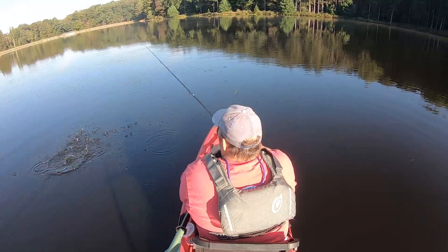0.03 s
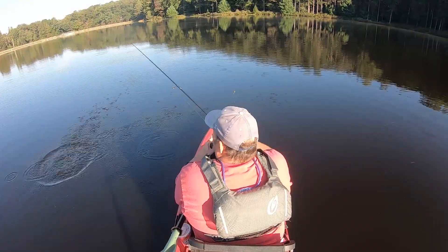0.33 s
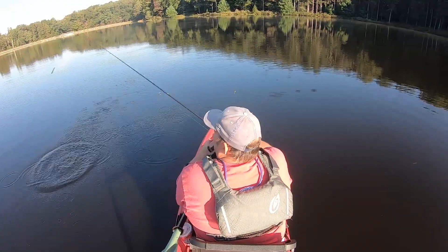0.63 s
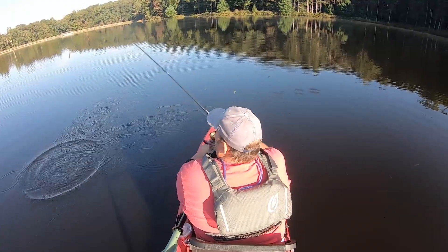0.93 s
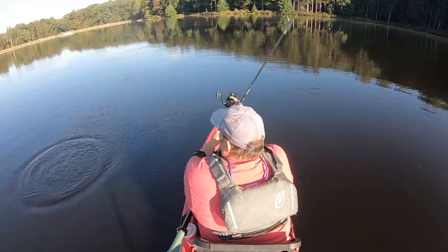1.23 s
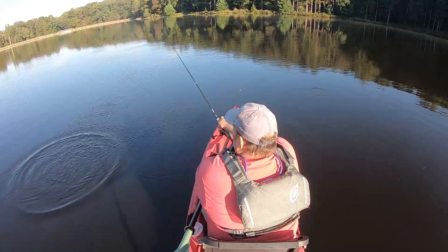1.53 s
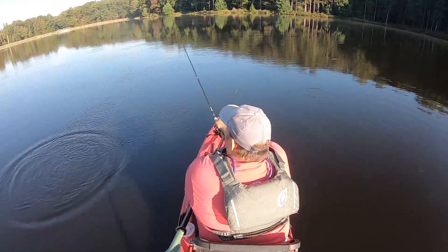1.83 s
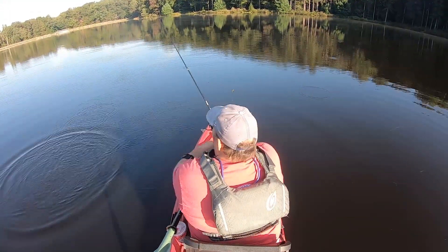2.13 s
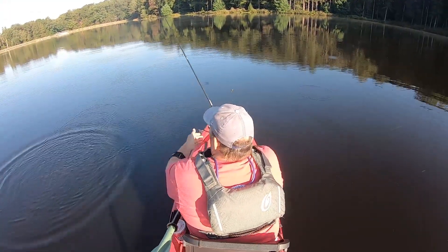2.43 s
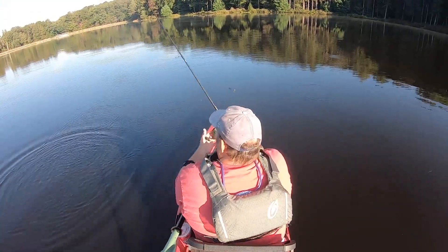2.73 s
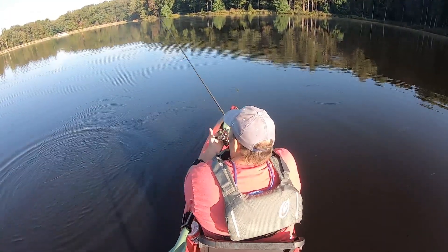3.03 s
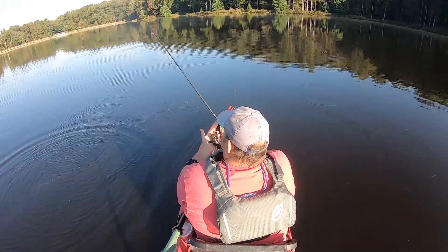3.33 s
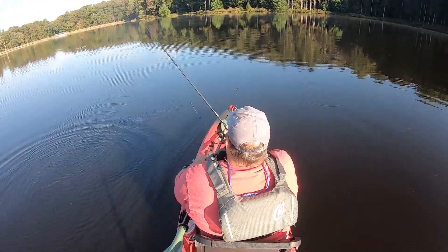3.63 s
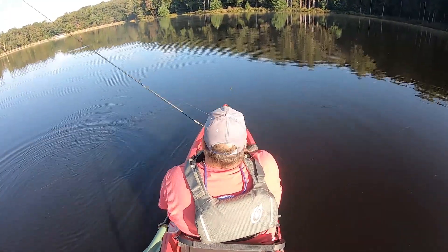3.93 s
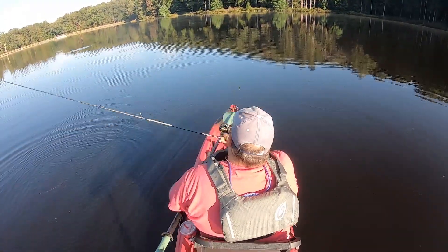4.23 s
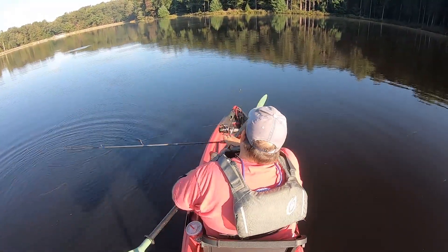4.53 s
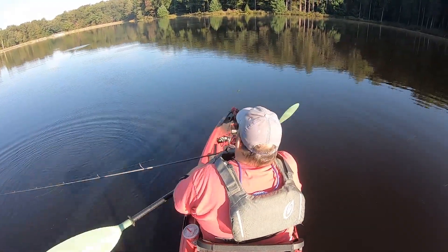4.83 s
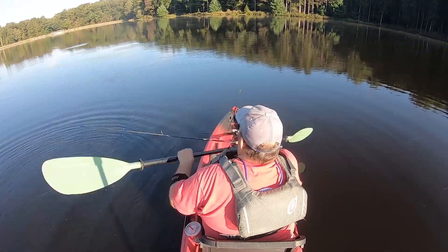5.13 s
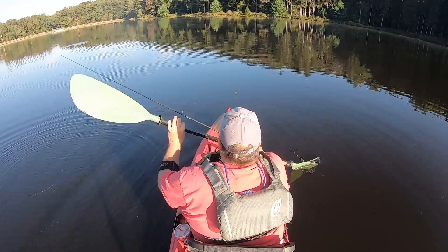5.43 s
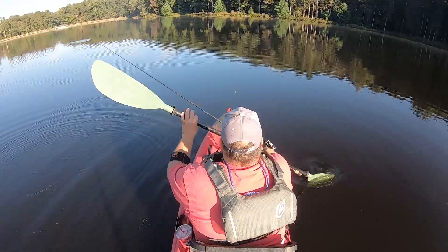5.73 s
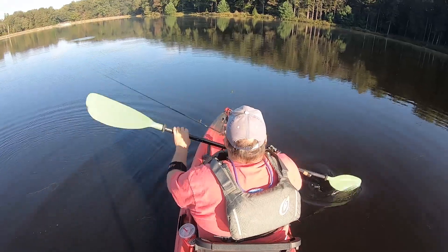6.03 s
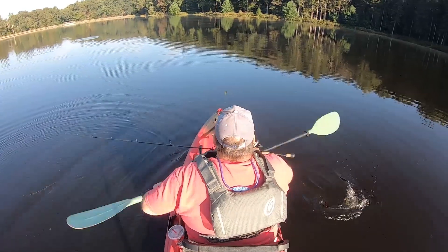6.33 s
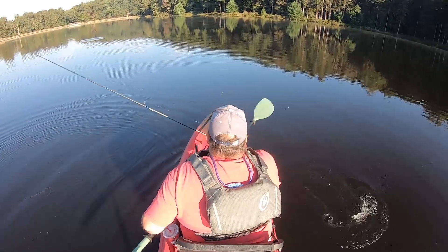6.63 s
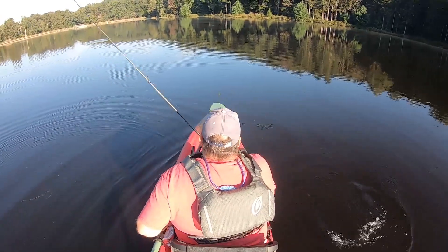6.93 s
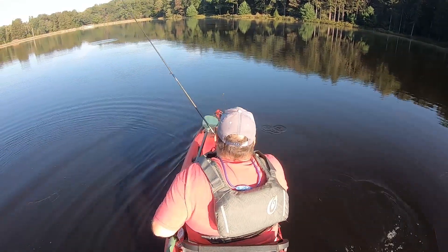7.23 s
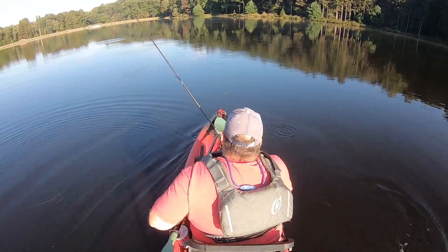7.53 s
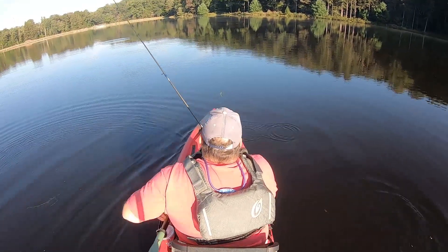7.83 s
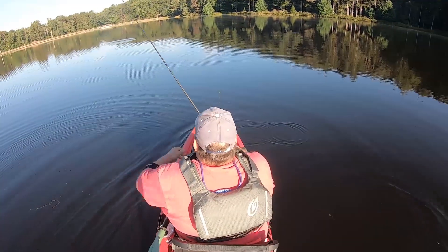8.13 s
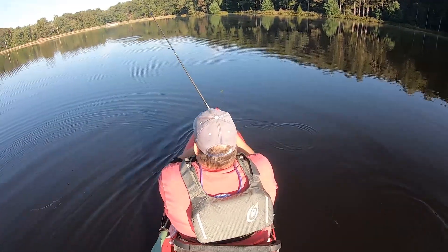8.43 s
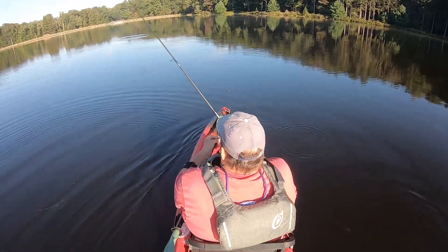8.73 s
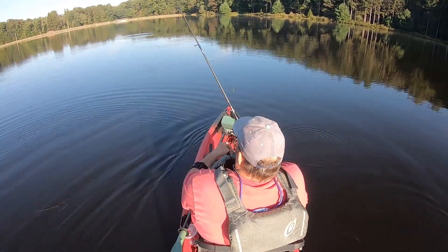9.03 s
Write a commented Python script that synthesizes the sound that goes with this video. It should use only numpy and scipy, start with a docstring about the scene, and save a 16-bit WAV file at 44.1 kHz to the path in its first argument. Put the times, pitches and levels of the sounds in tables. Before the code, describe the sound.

Heard close from a plastic kayak on open water, a far engine hums under everything. After a little splash with drips, a cast whistles and fishing line runs out. The microphone's pole clunks deeply in its socket, the loudest sound, and the rod is set down with hollow knocks. A single bubbling paddle stroke follows on the right, then a clatter against the hull and two small metal clinks.

```python
"""A small splash and chirping drips on the left of a calm lake, over a far engine's drone and low roar.
An angler in a plastic kayak casts: line and rod whistle through the air, then line hisses off the spool.
The rod is laid down and rings the hull. One paddle stroke slaps up bubbles and spray on the right,
and the paddle is stowed with a clatter. Loudest are the low clunks of a camera pole behind the seat,
which knocks in its socket when the boat rocks and shakes both microphones."""
import sys
import numpy as np
from scipy import signal
from scipy.fft import rfft, irfft, next_fast_len
from scipy.io import wavfile

SR = 44100
rng = np.random.default_rng(int(sys.argv[2]) if len(sys.argv) > 2 else 0)


def generate_wav(sig):
    """Save sig (samples, or channels by samples) to the path in sys.argv[1] as 16-bit PCM at SR."""
    pcm = np.round(np.clip(np.atleast_2d(sig).T, -1, 1) * 32767).astype(np.int16)
    wavfile.write(sys.argv[1], SR, pcm)


N = 399987
TIME = np.arange(N) / SR


def amp(db):
    """Decibels to gain."""
    return 10 ** (np.asarray(db) / 20)

def unit_rms(x):
    """Scales to rms 1."""
    return x / np.sqrt(np.mean(x ** 2) + 1e-20)

def unit_hit(x):
    """Scales the first 8 ms of a blow to rms 1."""
    return x / np.sqrt(np.mean(x[..., :350] ** 2) + 1e-20)

def at_hz(points, hz):
    """Reads a spectrum on a log-frequency axis."""
    f, value = np.transpose(points)
    return np.interp(np.log(hz + 1), np.log(f + 1), value)

def follow(rows):
    """Reads each column of a time curve at every sample."""
    s, *columns = np.transpose(rows)
    return [np.interp(TIME, s, c) for c in columns]

def bell(s, width_s):
    """A smooth rise to 1 at s seconds and back."""
    return np.exp(-np.minimum(((TIME - s) / width_s) ** 2, 60))

def ramp(start_s, rise_s):
    """A straight rise from 0 to 1."""
    return np.clip((TIME - start_s) / rise_s, 0, 1)

def swell(start_s, attack_s, hold_s, fade_db_per_s):
    """Attack, hold and a steady fade."""
    fading_s = np.maximum(TIME - start_s - attack_s - hold_s, 0)
    return ramp(start_s, attack_s) * amp(-fade_db_per_s * fading_s)

def add(mix, s, sound):
    """Mixes a sound in at s seconds."""
    part = mix[..., max(round(s * SR), 0):][..., :sound.shape[-1]]
    part += sound[..., :part.shape[-1]]

def pan(left_db):
    """Channel gains for a left minus right level."""
    return amp(np.array([[left_db], [-left_db]]) / 2)

def bins(x):
    """Frequencies of the spectrum of x."""
    return np.fft.rfftfreq(x.shape[-1], 1 / SR)

def colour(x, db):
    """Filters x by a gain per bin."""
    return irfft(rfft(x) * amp(db), x.shape[-1])

def shaped(x, spectrum):
    """Filters x by a table of Hz and dB, at rms 1."""
    return unit_rms(colour(x, at_hz(spectrum, bins(x))))

def stereo_noise(count, alike):
    """White noise with a left-right correlation, overall or per bin."""
    left, other = rng.standard_normal((2, count))
    apart = np.sqrt(1 - alike ** 2)
    if np.ndim(alike):
        return np.array([left, irfft(alike * rfft(left) + apart * rfft(other), count)])
    return np.array([left, alike * left + apart * other])

def wander(rate_hz):
    """Low-passed random drift of rms 1."""
    noise = rng.standard_normal(next_fast_len(N, True))
    return unit_rms(irfft(rfft(noise) * np.exp(-(bins(noise) / rate_hz) ** 2), len(noise))[:N])

def resonate(x, hz, width_hz):
    """A moving resonance, applied twice for steep sides."""
    carrier = np.exp(2j * np.pi * np.cumsum(hz) / SR)
    r = np.exp(-np.pi * width_hz / SR)
    return unit_rms((carrier * signal.lfilter([(1 - r) ** 2], [1, -2 * r, r * r], x / carrier)).real)

def ring(modes, t, spread=0.011, uneven_db=2):
    """Modes of a body, a little different wherever it is struck."""
    hz, db, t60 = np.transpose(modes)[:, :, None]
    detune, size, sign = rng.standard_normal((3, len(modes), 1))
    decay = amp(db + uneven_db * size - 60 * t / t60)
    return (np.sign(sign) * decay * np.sin(2 * np.pi * hz * (1 + spread * detune) * t)).sum(0)

def stereo_ring(modes, t, spread):
    """A shared ring plus a weaker one for each side."""
    return ring(modes, t, spread) + .5 * np.array([ring(modes, t), ring(modes, t)])


# Engine roar with a faint hush above it, and hull rumble. Each row: frequency in Hz, level in dB.
ROAR_SPECTRUM = [(20, -39), (60, -6), (135, 2), (215, 1), (300, -9.5), (480, -20.5), (780, -15),
                 (1400, -22.5), (2500, -31), (5000, -38), (7000, -43), (10000, -50), (12000, -72),
                 (15000, -70.5)]
RUMBLE_SPECTRUM = [(18, -18), (32, 0), (62, -1), (90, -1), (200, -39), (1000, -79.5)]
# Each row: frequency in Hz, left-right correlation.
ROAR_CORRELATION = [(30, 0.59), (130, 0.94), (250, 0.98), (500, 0.36), (900, 0.023), (2500, 0.41),
                    (9000, 0.035)]
# Each row: time in seconds, level in dB.
ROAR_LEVEL = [(0, -54.5), (.9, -51.5), (2.3, -51), (3.3, -54), (4.6, -51.5), (6.2, -48.5), (7.2, -51.5),
              (8.3, -50), (9.07, -48.5)]

def roar_and_rumble(swell_db=1.5, rumble_db=-57):
    """A far engine's low, blurred roar under a faint hush of open air; the hull rumbles softly."""
    roar = shaped(stereo_noise(N, at_hz(ROAR_CORRELATION, bins(TIME))), ROAR_SPECTRUM)
    rumble = shaped(rng.standard_normal(N), RUMBLE_SPECTRUM) * ramp(start_s=.8, rise_s=3.4)
    return amp(follow(ROAR_LEVEL)[0] + swell_db * wander(0.76)) * roar + amp(rumble_db) * rumble


# Each row: time in seconds, cycles per second.
ENGINE_SPEED = [(0, 22.6), (1.7, 22.45), (2.5, 23.3), (4.1, 22.15), (5.2, 22.65), (7.4, 22.75),
                (9.07, 22.55)]
# Each row: time in seconds, level in dB.
DRONE_LEVEL = [(0, -51), (2, -53), (2.5, -49.5), (4.8, -48), (9.07, -56.5)]
# Each row: centre in seconds, half length in seconds, depth in dB.
THROB_DIPS = [(6.937, 0.053, 16), (8.07, 0.067, 8), (8.863, 0.066, 3.5)]
# Each row: multiple of the engine speed, relative level in dB.
DRONE_ORDERS, THROB_ORDERS = [(6, -1.5), (9, -11), (10, -24.5), (12, -15.5)], [(5, -2), (8, -13), (11, -21)]

def engine(waver_db=3.0, drift_rad=0.75, faint_db=-62.5, full_db=-41.5):
    """A far engine's harmonics waver on their way over the water; a deeper throb sets in."""
    turns = np.cumsum(follow(ENGINE_SPEED)[0]) / SR
    throb_db = faint_db + (full_db - faint_db) * ramp(start_s=3.24, rise_s=0.42)
    throb_db -= sum(db * bell(s, width_s) for s, width_s, db in THROB_DIPS)
    out = np.zeros(N)
    for orders, level_db in ((DRONE_ORDERS, follow(DRONE_LEVEL)[0]), (THROB_ORDERS, throb_db)):
        for order, db in orders:
            level = amp(level_db + db + waver_db * wander(14.5))
            out += level * np.sin(2 * np.pi * order * turns + drift_rad * wander(6.4))
    return np.sqrt(2) * out


# Each row: frequency in Hz, level in dB.
CLOTH_SPECTRUM = [(1000, -29), (2200, -12.5), (3800, -4.5), (6800, -13), (8500, -24.5), (10200, -12),
                  (13500, -30), (15000, -36)]
# Each row: centre in seconds, half length in seconds, level in dB.
ARM_REACHES = [(5.257, 0.18, -63.5), (8.837, 0.15, -78)]

def sleeve():
    """Sliding cloth hisses as the arms reach."""
    level = sum(amp(db) * bell(s, width_s) for s, width_s, db in ARM_REACHES)
    return level * shaped(stereo_noise(N, alike=0.61), CLOTH_SPECTRUM)


def reel(s=3.09, width_s=0.16, db=-79, hz=3420, sag_hz_per_s=700):
    """The handled reel rings faintly, sinking in pitch."""
    note = resonate(rng.standard_normal(N), hz - sag_hz_per_s * (TIME - s), width_hz=100)
    return amp(db) * bell(s, width_s) * note


# Air around the fast line. Each row: frequency in Hz, level in dB.
RUSH_SPECTRUM = [(2000, -26), (5500, -4), (7000, 3), (8400, -4), (10200, 4), (11500, -11), (14000, -9),
                 (15500, -31)]
# Back, then forward. Each row: peak in seconds, half length in seconds, top pitch in Hz, level in dB.
LINE_SWINGS = [(1.302, 0.07, 10100, -57.5), (1.47, 0.032, 9900, -49)]

def line_whistle(slow_hz=6030, rush_db=3, release_s=1.468, fade_s=0.0058, flight_db=-64):
    """Eddy tones follow the line's speed until its release; a rush of air carries on in flight."""
    hz, tone_level, rush_level = slow_hz, 0, 0
    for s, width_s, top_hz, db in LINE_SWINGS:
        speed = bell(s, width_s)
        hz += (top_hz - slow_hz) * speed
        tone_level += amp(db) * speed ** 0.34
        rush_level += amp(db + rush_db) * speed ** 1.4
    held = np.exp(-np.maximum(TIME - release_s, 0) / fade_s)
    rush = shaped(rng.standard_normal((2, N)), RUSH_SPECTRUM)
    tone = resonate(stereo_noise(N, alike=0.11), hz, width_hz=1400)
    flight = amp(flight_db) * (1 - held) * bell(PAYOUT_START_S, width_s=0.36) * rush
    return held * (tone_level * tone + rush_level * rush) + flight

def rod_swish(s=1.496, peak_s=0.017, width_s=0.026, low_hz=460, top_hz=3180, db=-40, butt_db=-6):
    """The whipping rod sheds eddies; its thick, slow butt sounds lower than its tip."""
    hz = low_hz + (top_hz - low_hz) * np.exp(-abs(TIME - s) / peak_s)
    tip = bell(s, width_s) * resonate(stereo_noise(N, alike=0.82), hz, width_hz=900)
    butt = bell(s, width_s * 2.3) * resonate(stereo_noise(N, alike=0.84), hz * 0.46, width_hz=450)
    return amp(db) * (tip + amp(butt_db) * butt)

def cast(flutter_db=2):
    """Line and rod cut the air with a shared flutter."""
    return (line_whistle() + rod_swish()) * amp(flutter_db * wander(140))


# The running line. Each row: frequency in Hz, level in dB.
RUB_SPECTRUM = [(200, -23), (400, -6.5), (1500, 5), (2100, 2), (3200, 8), (4600, -0.5), (5400, -3),
                (7000, 0), (8300, -15), (10000, -7), (12000, -22), (14500, -26)]
HISS_SPECTRUM = [(1500, -22.5), (3500, 3), (5000, 0.5), (6000, 4), (6900, 5), (7700, -26.5), (10000, -12.5),
                 (12000, -33)]
# High as the lure climbs, lower as it falls. Each row: time in seconds, pitch in Hz, level in dB.
SPOOL_HISS = [(1.55, 10300, -80), (1.87, 9800, -65), (2.03, 9300, -72), (2.07, 6800, -68.5),
              (2.25, 5870, -77), (2.9, 5170, -87)]
PAYOUT_START_S, BAIL_CLOSE_S, STOP_DB_PER_S = 1.541, 2.61, 26.5

def payout(rub_db=-43, fade_db_per_s=20, half_speed_s=0.038, sing_db=-11, hiss_db=-72, backswing_db=-61):
    """Line rubs through the guides and hisses off the spool, braked by the air, until the bail closes."""
    flight_s = np.maximum(TIME - PAYOUT_START_S, 0)
    speed = 1 / (1 + flight_s / half_speed_s)
    stopping = amp(-STOP_DB_PER_S * np.maximum(TIME - BAIL_CLOSE_S, 0))
    running = np.where(TIME < PAYOUT_START_S, bell(PAYOUT_START_S, width_s=0.066), stopping)
    rub = shaped(stereo_noise(N, alike=0.85), RUB_SPECTRUM)
    guide_ring = resonate(stereo_noise(N, alike=0.41), hz=np.full(N, 4800), width_hz=250)
    rub = unit_rms((rub + amp(sing_db) * guide_ring) * amp(2.5 * wander(110)))
    spool_hz, spool_db = follow(SPOOL_HISS)
    broad = amp(hiss_db) * shaped(stereo_noise(N, alike=0.9), HISS_SPECTRUM)
    coil_flutter = amp(wander(130) + 0.97 * wander(25))
    spool = amp(spool_db) * resonate(stereo_noise(N, alike=0.63), spool_hz, width_hz=1100)
    guides = amp(rub_db - fade_db_per_s * flight_s) * speed * rub
    backswing = amp(backswing_db) * bell(LINE_SWINGS[0][0], width_s=0.12) * rub
    return running * (guides + coil_flutter * (broad + spool)) + backswing


def bubble(hz, t60, octaves_per_s):
    """An air pocket rings and climbs as it nears the surface; the climb is linear in Hz."""
    t = np.arange(0, t60, 1 / SR)
    pitch_hz = hz * (1 + np.log(2) * octaves_per_s * t)
    return np.sin(2 * np.pi * np.cumsum(pitch_hz) / SR) * amp(-60 * t / t60) * (1 - np.exp(-t * hz / 2))

def bubble_cloud(length, low_hz, high_hz, cycles, size_db, climb, sizes=48, pops_per_s=1400):
    """Each bubble size pops at its own random moments and places; yields Hz and stereo sound."""
    for hz in low_hz * (high_hz / low_hz) ** ((np.arange(sizes) + rng.random(sizes)) / sizes):
        pops = np.zeros((2, length))
        at = rng.integers(0, length, rng.poisson(pops_per_s * length / SR / sizes))
        strength = amp(size_db * np.minimum(rng.exponential(1, len(at)), 4))
        pops[:, at] = strength * (1 + 0.59 * rng.standard_normal((2, len(at))))
        pop = bubble(hz, cycles * rng.uniform(0.55, 3.6) / hz, climb * hz * rng.random())
        yield hz, signal.oaconvolve(pops, pop[None] / np.linalg.norm(pop), axes=1)[:, :length]

def splats(count, per_s=150, size_db=5, decay_s=0.0021):
    """Level of a wash in which falling drops slap the surface."""
    size = amp(size_db * np.minimum(rng.exponential(1, count), 4)) * (rng.random(count) < per_s / SR)
    return np.sqrt(1 + signal.lfilter([1], [1, -np.exp(-1 / (decay_s * SR))], size ** 2))


# Spray, also the crack of a tap. Each row: frequency in Hz, level in dB.
SPRAY_SPECTRUM = [(1200, 0), (2000, -2), (3000, 0), (4500, -8.5), (7000, -7), (10500, -15), (12000, -33)]

def stirred_water(surges, span_s, spray_gain_db=1, wash_db=-1):
    """Gurgling bubbles, pattering drops and a soft wash swell with each surge."""
    start_s, length = surges[0][0], int(span_s * SR)
    large = bubble_cloud(length, low_hz=265.8, high_hz=2567, cycles=32, size_db=5, climb=0.0182)
    small = bubble_cloud(length, low_hz=1200, high_hz=6880, cycles=10, size_db=4, climb=0.005)
    cloud = sum(pops for _, pops in large)
    drops = sum(amp(at_hz(SPRAY_SPECTRUM, hz)) * pops for hz, pops in small)
    wash = stereo_noise(length, alike=0.43) * splats(length)
    wash = colour(wash, at_hz(SPRAY_SPECTRUM, bins(wash)) - 10 * np.log10(bins(wash) + 900))
    gurgle, spray = np.zeros((2, 2, N))
    add(gurgle, start_s, unit_rms(cloud))
    add(spray, start_s, unit_rms(unit_rms(drops) + amp(wash_db) * unit_rms(wash)))
    power = sum((amp([[gurgle_db], [spray_db]]) * swell(*shape)) ** 2
                for *shape, gurgle_db, spray_db in surges)
    gurgle_level, spray_level = np.sqrt(power)
    return gurgle_level * gurgle + amp(spray_gain_db) * spray_level * spray


# Each row: start, attack and hold in seconds, fade in dB per second, gurgle and spray in dB.
SPLASH_SURGES = [(0, 0.0016, 0.032, 403, -59.5, -57), (.04, 0.011, .02, 52, -89, -65)]
# Each row: start in seconds, level in dB, pitch in Hz, initial climb in octaves per second.
DRIPS = [(.012, -40, 560, 29), (.051, -35.5, 1860, 630), (.165, -43.5, 3340, 3), (0.248, -36.5, 2420, 1360),
         (.336, -43, 3550, 1600), (.343, -47, 4500, 780)]

def splash(drip_cycles=39.5, left_db=6.5, top_hz=10200):
    """A small splash dies away while drips chirp on the left."""
    out = stirred_water(SPLASH_SURGES, span_s=.7)
    for s, db, hz, climb in DRIPS:
        samples_to_top = int(SR * (top_hz / hz - 1) / (np.log(2) * climb))
        chirp = bubble(hz, drip_cycles / hz, climb)[:samples_to_top]
        add(out, s, amp(db) * chirp * pan(left_db))
    return out


# Pull, lift and falling water.
# Each row: start, attack and hold in seconds, fade in dB per second, gurgle and spray in dB.
STROKE_SURGES = [(5.73, 0.076, 0.27, 47, -54, -61.5), (6.03, 0.16, 0.036, 51, -47.5, -55.5),
                 (6.28, 0.045, 0.043, 57, -56, -47), (6.4, 0.12, 0.18, 42.5, -50, -52.5)]
# Each row: start in seconds, level in dB, pitch in Hz.
BLADE_BUBBLES = [(5.137, -46.5, 2080), (5.635, -36, 1850), (5.79, -36.5, 756), (5.82, -39, 780),
                 (5.97, -37, 540), (6.085, -42, 726), (6.078, -41.5, 1780), (6.08, -36.5, 383),
                 (6.206, -30, 240), (6.312, -31.5, 222), (6.367, -36, 1133), (6.389, -32, 977),
                 (6.653, -33.5, 1480), (6.694, -33.5, 1360), (6.713, -35, 1450), (6.753, -37.5, 2970),
                 (6.775, -37.5, 752), (6.868, -44.5, 1133), (6.916, -37, 1650), (7.11, -42, 1264)]
# Each row: frequency in Hz, left minus right in dB.
BLADE_SHADOW = [(300, 0.5), (750, -6.5), (1100, -21), (2000, -14)]

def paddle_stroke(gain_db=3, bubble_cycles=43, octaves_per_cycle=0.0065):
    """The blade stirs water on the right, shaded from the left microphone; large bubbles stand out."""
    out = amp(gain_db) * stirred_water(STROKE_SURGES, span_s=1.9)
    left_shade_hz_db = [(400, -2.5), (1200, -12.5), (3000, -6.5), (6000, -4.0), (9000, -1.0)]
    out[0] = colour(out[0], at_hz(left_shade_hz_db, bins(TIME)))
    for s, db, hz in BLADE_BUBBLES:
        note = bubble(hz, bubble_cycles / hz, octaves_per_cycle * hz)
        add(out, s, amp(db) * note * pan(at_hz(BLADE_SHADOW, hz)))
    return out


# Each row: start and length in seconds, first and last pitch in Hz, level in dB.
GULPS = [(5.991, 0.04, 417, 670, -51), (6.32, 0.029, 290, 820, -46), (6.349, .075, 755, 1390, -55),
         (6.415, 0.046, 478, 947, -52), (6.479, 0.077, 727, 1653, -57.5)]

def gulps():
    """Water closes behind the blade; the air pocket shrinks, so its note climbs."""
    out = np.zeros((2, N))
    for s, length_s, low_hz, high_hz, db in GULPS:
        progress = np.arange(0, 1, 1 / (length_s * SR))
        hz = low_hz + (high_hz - low_hz) * progress
        note = resonate(rng.standard_normal(len(hz)), hz, width_hz=130)
        note += np.sin(2 * np.pi * np.cumsum(hz) / SR)
        arch = abs(np.sin(np.pi * progress)) ** .5
        add(out, s, amp(db) * unit_rms(note * arch) * pan(at_hz(BLADE_SHADOW, hz.mean())))
    return out


# Each row: start and length in seconds, level in dB, typical pitch in Hz.
SCRAPES = [(4.239, 0.2, -74, 2200), (5.488, 0.047, -56, 3130)]

def slips(count=9, t60_s=.02, spread_octaves=0.27, uneven_db=5):
    """Shaft and fittings scrape in quick random slips; returns rows like those of CLICKS."""
    return [(s + length_s * at, db + uneven_db * size, hz * 2 ** (spread_octaves * pitch), t60_s)
            for s, length_s, db, hz in SCRAPES
            for at, (size, pitch) in zip(rng.random(count), rng.standard_normal((count, 2)))]


# Each row: start in seconds, level in dB, pitch in Hz, t60 in seconds.
CLICKS = [(0.942, -58.5, 6860, 0.013), (2.941, -60.5, 4630, 0.072), (3.467, -53.5, 4420, 0.012),
          (3.48, -46.5, 2870, 0.019), (3.541, -49.5, 2120, 0.006), (3.541, -55.5, 4870, .008),
          (3.586, -61, 5180, 0.051), (5.386, -51, 1630, 0.015), (5.392, -47.5, 3050, 0.035),
          (5.486, -41, 3580, 0.013), (5.505, -49, 5180, 0.028), (5.516, -44, 1794, 0.076),
          (5.528, -52, 4800, 0.02), (5.625, -44, 2470, 0.0083), (5.642, -56, 4100, 0.016),
          (6.309, -46, 740, 0.02), (6.338, -50, 6940, 0.0092), (6.391, -42.5, 2470, 0.011),
          (6.499, -59, 3940, 0.015), (6.268, -47, 2440, .02), (6.288, -46, 1570, .015),
          (6.148, -49, 2430, 0.032), (6.694, -41.5, 1490, 0.028), (6.726, -45.5, 3410, 0.014),
          (7.076, -54, 4850, 0.018), (7.692, -55, 1800, 0.11)]

def clicks_and_drops(rise_s=.001, skirt_db=13, ring_db=-3, tail_db=-29, tail_t60_s=0.45, dull_hz=6800):
    """Water drops, blade slaps and small fittings click: a short pitched burst, a ring and a faint tail."""
    out, t = np.zeros((2, N)), np.arange(6000) / SR
    for s, db, hz, t60 in CLICKS + slips():
        onset = 1 - np.exp(-t / rise_s)
        decay = amp(-60 * t / t60)
        burst = stereo_noise(len(t), alike=0.59) * onset * (decay + amp(tail_db - 60 * t / tail_t60_s))
        octaves = abs(np.log2((bins(t) + 1) / hz))
        burst = colour(burst, -skirt_db * octaves ** 1.14 - (bins(t) / dull_hz) ** 4) * (1 - t / t[-1])
        note = onset * decay * np.sin(2 * np.pi * hz * t)
        add(out, s, amp(db) * unit_hit(unit_hit(burst) + amp(ring_db) * unit_hit(note)))
    return out


# Reel seat and metal fitting. Each row: start in seconds, level in dB.
REEL_SEAT_CLACKS = [(4.224, -41.5), (4.282, -69), (4.317, -68), (7.7175, -54)]
FITTING_CLINKS = [(8.917, -47), (8.952, -47.5)]
# Each row: frequency in Hz, level in dB, t60 in seconds.
REEL_SEAT_MODES = [(1350, -21, .055), (2085, -7, 0.048), (2500, 2, 0.036), (3580, -10.5, 0.034),
                   (4260, -6, 0.023)]
FITTING_MODES = [(1470, 4, 0.037), (3050, 0, 0.038), (3200, -17, 0.05), (4600, -14, 0.048),
                 (6200, -10, 0.027)]

def taps(rows, modes, crack_db, crack_t60_s=0.015):
    """A tapped hard part gives a brief crack and a pitched ring."""
    out, t = np.zeros((2, N)), np.arange(8192) / SR
    for s, db in rows:
        note = stereo_ring(modes, t, spread=0.011)
        crack = shaped(stereo_noise(len(t), alike=0.54), SPRAY_SPECTRUM) * amp(-60 * t / crack_t60_s)
        add(out, s, amp(db) * unit_hit(unit_hit(note) + amp(crack_db) * unit_hit(crack)))
    return out


# Each row: frequency in Hz, level in dB.
CLATTER_SPECTRUM = [(200, -31), (600, -2), (1200, -0.5), (2200, -3.5), (4000, -8.5), (7000, -15.5),
                    (8500, -37), (10000, -25.5), (13000, -55)]
# Each row: frequency in Hz, t60 in seconds.
CLATTER_DECAY = [(300, 0.56), (1200, 0.16), (3500, 0.087), (5200, 0.035), (10000, 0.046)]

def clatter(count):
    """The hull's dense modes, as noise whose treble dies first."""
    hz, s, spectra = signal.stft(stereo_noise(count, alike=0.75), SR, nperseg=128)
    hz = hz[:, None]
    spectra *= amp(at_hz(CLATTER_SPECTRUM, hz) - 60 * s / at_hz(CLATTER_DECAY, hz))
    return signal.istft(spectra, SR, nperseg=128)[1][:, :count]


# Plastic shell, paddle shaft and hull cavity. Each row: frequency in Hz, level in dB, t60 in seconds.
HULL_MODES = [(534, -5, 0.11), (619, -5, 0.041), (835, -6.5, 0.078), (1073, -2, 0.09), (1280, 1, 0.049),
              (1418, -5, 0.061), (1623, 1, 0.029), (1974, -1, 0.033), (2596, -2, 0.023), (3470, -7, 0.028),
              (3805, -6.5, 0.02), (5260, -22, 0.025)]
SHAFT_MODES = [(447.5, -1, 0.18), (572, 4.5, 0.034), (722, 8.5, 0.025), (1435, 0, 0.059), (1250, -6, 0.05),
               (2104, -5.5, 0.077), (2330, -12, 0.08), (2550, -20.5, 0.062), (3360, -10, 0.04),
               (4080, -23, 0.01), (5430, -33, 0.013)]
CAVITY_MODES = [(179.4, 3, 0.71), (231.5, 6, 0.15), (321.7, 5, 0.098), (367, -7, 0.34)]
# Each row: start in seconds, level in dB, tilt in dB per octave, boom in dB, shaft share from 0 to 1.
HULL_KNOCKS = [(3.967, -43, -3, -33, 0.2), (4.171, -36.5, 7, -45, 0.36), (4.193, -55, 8, -37.5, 0.1),
               (4.225, -47.5, 3, -35.5, 0.6), (4.281, -56, 1, -38, 0.94), (4.53, -60.5, 4.5, -40, 0.3),
               (4.931, -31.5, -2, -45, 0.1), (4.9885, -37.5, -0.5, -46, 0.31),
               (5.487, -42.5, 4, -46.5, 0.4), (7.604, -42.5, 12.5, -50, 0.9), (7.613, -42, 0, -42.5, 0.55),
               (7.7175, -44.5, 3.5, -39.5, 0.54), (7.7785, -33, 1, -36.5, 0.9),
               (7.788, -38.5, -19, -37.5, 0.9), (7.8254, -38, -0.5, -41, 0.9), (7.871, -48, -2.5, -44, 0.8),
               (7.9494, -52.5, 3.5, -44, 0.7)]

def hull_knocks(clatter_db=-8, rise_s=0.001, boom_rise_s=0.0015):
    """Rod and paddle strike the hull: shell and shaft ring, and the hollow inside booms."""
    out, t = np.zeros((2, N)), np.arange(16384) / SR
    octaves = np.log2(np.clip(bins(t), 500, 5500) / 1500)
    for s, db, tilt_db, boom_db, share in HULL_KNOCKS:
        dense = amp(clatter_db) * unit_hit(clatter(len(t)))
        modes = (1 - share) * unit_hit(ring(HULL_MODES, t)) + share * unit_hit(ring(SHAFT_MODES, t))
        blow = colour(unit_hit(modes) + dense, tilt_db * octaves)
        blow *= (1 - np.exp(-t / rise_s)) * (1 - t / t[-1])
        boom = unit_hit(stereo_ring(CAVITY_MODES, t, spread=0.0804)) * (1 - np.exp(-t / boom_rise_s))
        add(out, s, amp(db) * unit_hit(blow) + amp(boom_db) * boom)
    return out


# Each row: frequency in Hz, level in dB, t60 in seconds, left minus right in dB.
POLE_MODES = [(33.74, -9.5, 0.63, -26.5), (55.8, -10, 0.47, -8), (88.4, -2, 0.21, -24.5),
              (123, -9.5, 0.034, 5), (159, -1, 0.052, -3.5), (184.4, -25, 0.2, 0), (273, -10, 0.01, 7),
              (348, -23.5, 0.069, 2), (707, 8.5, 0.013, 2.5), (850, -1.5, 0.024, 2.5),
              (1228, -1.5, 0.04, 3), (1482, -25.5, 0.021, 11), (2040, -32.5, .016, 10)]
# Each row: start in seconds, hard ring in dB, fall-back delay in seconds, second thud in dB.
POLE_CLUNKS = [(2.9408, -5, 0.031, -0.5), (3.584, -8.5, .04, -5), (5.871, -17.5, .025, -4.5)]
# The pole sways without knocking. Each row: start in seconds, sway in dB.
BOAT_ROCKS = [(1.484, -30.5), (4.426, -21.5), (5.168, -28), (5.465, -26.5), (7.433, -14.5), (7.47, -24),
              (7.708, -18), (7.792, -21), (9, -25)]

def pole(rise_s=0.0035, sway_rise_s=0.0084, sway_below_hz=110, hard_above_hz=600):
    """The pole knocks in its socket and falls back, shaking the microphones in opposite senses."""
    out, t = np.zeros((2, N)), np.arange(SR) / SR
    # Each row: start in seconds, then thud, hard ring and sway in dB.
    blows = [(s, 0, hard_db, -10) for s, hard_db, _, _ in POLE_CLUNKS]
    blows += [(s + delay_s, db, -21.5, -7.5) for s, _, delay_s, db in POLE_CLUNKS]
    blows += [(s, db - 3.5, db - 26, db) for s, db in BOAT_ROCKS]
    for hz, mode_db, t60, left_db in POLE_MODES:
        sways, hard = hz < sway_below_hz, hz > hard_above_hz
        onset = 1 - np.exp(-(t / (sway_rise_s if sways else rise_s)) ** 2)
        mode = onset * amp(mode_db - 60 * t / t60) * np.sin(2 * np.pi * hz * t)
        shake = np.array([-amp(left_db) * mode, mode])
        for s, thud_db, hard_db, sway_db in blows:
            add(out, s, amp(sway_db if sways else hard_db if hard else thud_db) * shake)
    return out


def scene():
    """Open water gives no echo: all sources add dry."""
    impacts = pole() + hull_knocks() + clicks_and_drops()
    impacts += taps(REEL_SEAT_CLACKS, REEL_SEAT_MODES, crack_db=-19)
    impacts += taps(FITTING_CLINKS, FITTING_MODES, crack_db=-2)
    angler = gulps() + cast() + payout() + reel() + sleeve() + paddle_stroke()
    return impacts + angler + splash() + engine() + roar_and_rumble()

def record(dry, cutoff_hz=14800):
    """The camera's band limit."""
    lowpass = signal.firwin(255, cutoff_hz, window=("kaiser", 9), fs=SR)
    return signal.oaconvolve(dry, lowpass[None], "same")


dry = scene()
out = record(dry)
generate_wav(out)
```